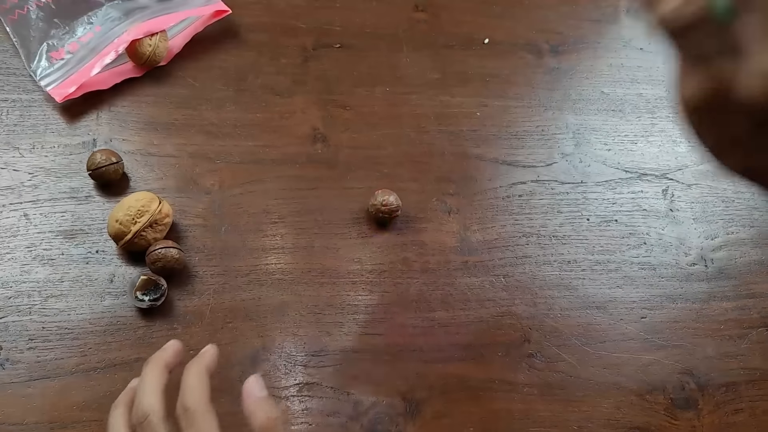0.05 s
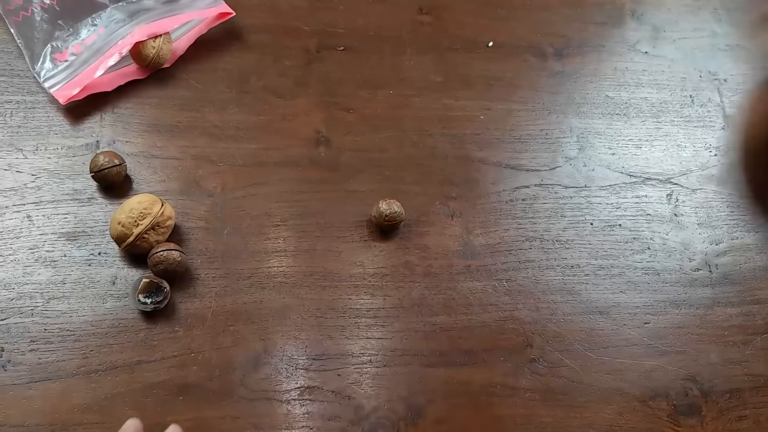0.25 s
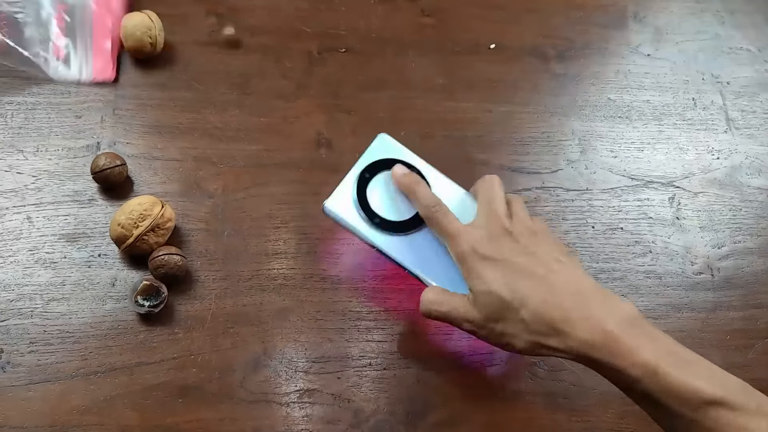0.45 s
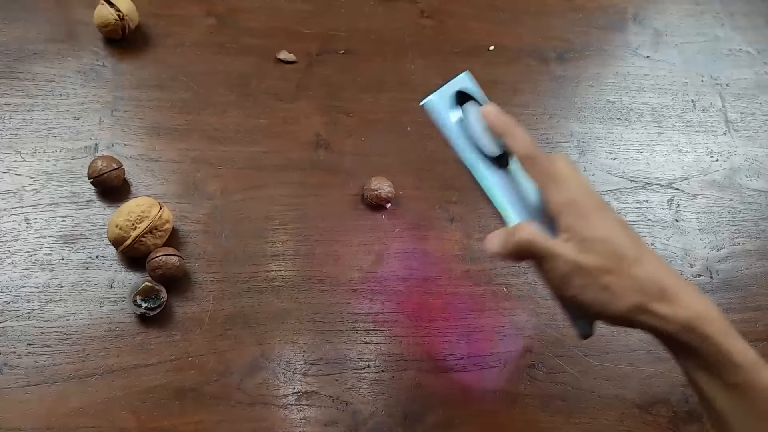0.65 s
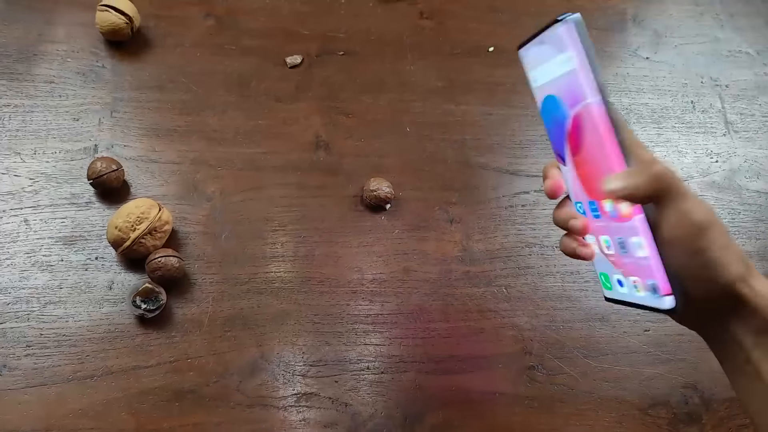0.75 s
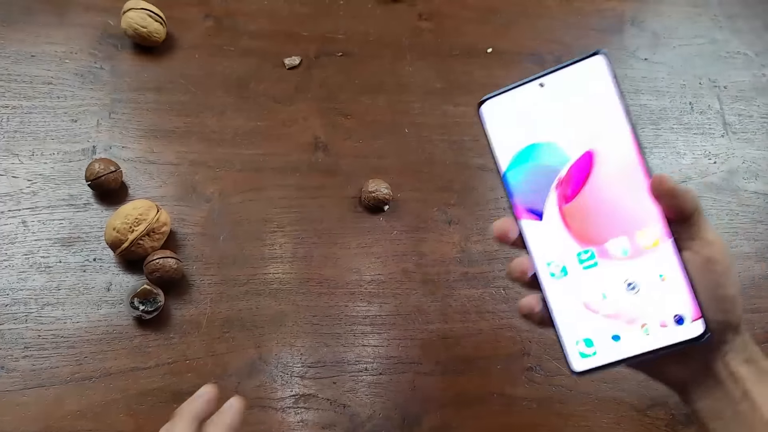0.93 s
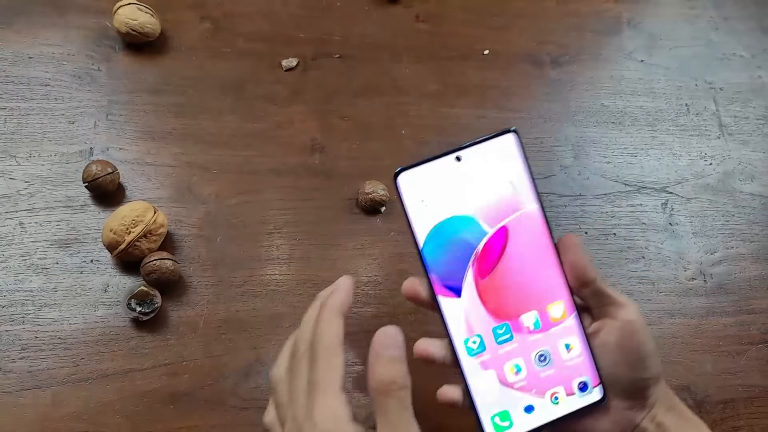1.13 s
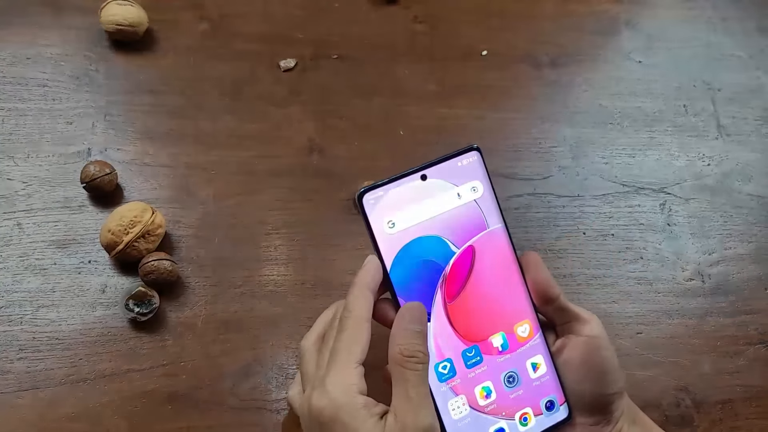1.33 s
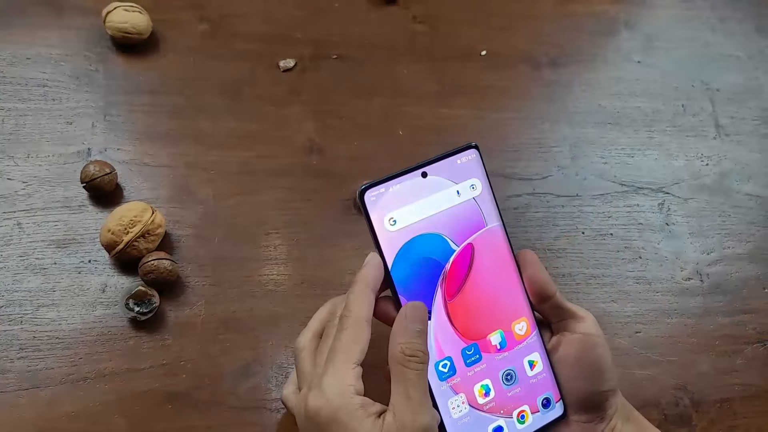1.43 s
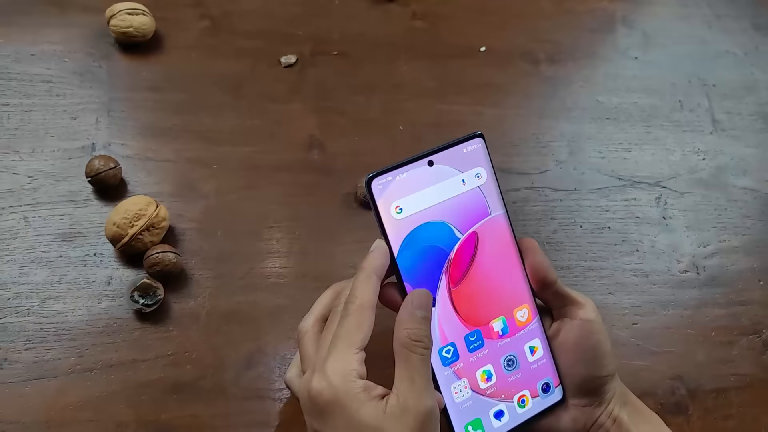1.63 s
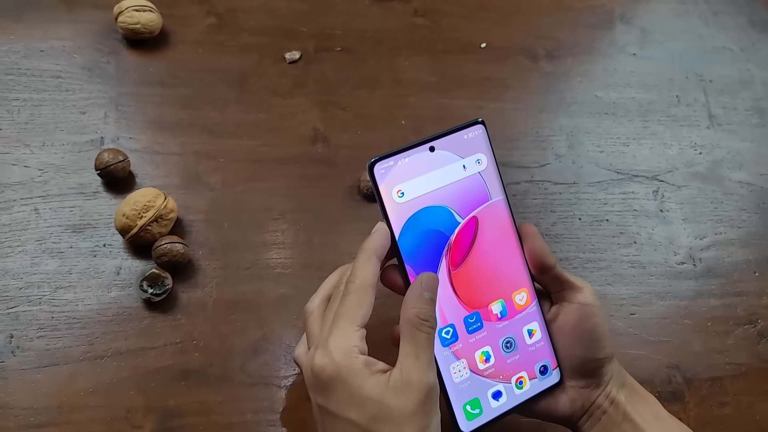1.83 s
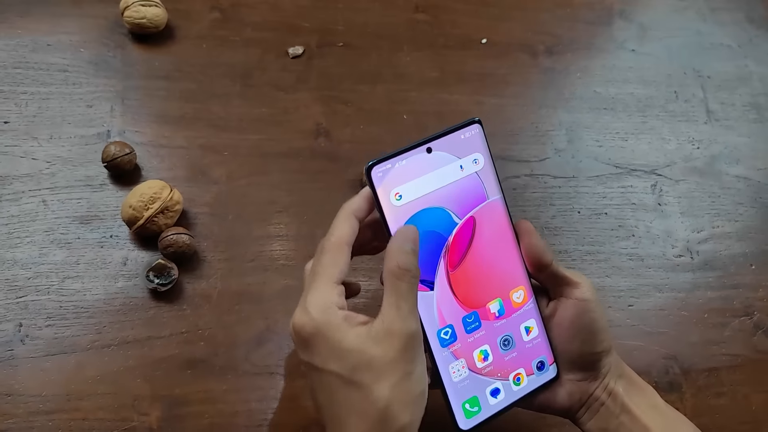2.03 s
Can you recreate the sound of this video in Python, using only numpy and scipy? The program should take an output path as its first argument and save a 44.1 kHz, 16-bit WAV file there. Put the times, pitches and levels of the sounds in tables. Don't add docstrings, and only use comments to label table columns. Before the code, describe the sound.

After a couple of faint taps, one violent wooden bang with a shell crunch overloads the close microphone; the echo is held up, then tiny chips tick down and thin metal pings softly across the small room.

```python
import sys
import numpy as np
from scipy import signal
from scipy.fft import rfft, irfft
from scipy.io import wavfile
from scipy.ndimage import uniform_filter1d

SR = 44100
rng = np.random.default_rng(int(sys.argv[2]) if len(sys.argv) > 2 else 0)


def linear_from_db(decibels):
    return 10 ** (np.asarray(decibels, float) / 20)


def store_wav(level_fs):
    pcm = np.round(np.clip(np.atleast_2d(level_fs), -1, 1) * 32767)
    wavfile.write(sys.argv[1], SR, pcm.T.astype(np.int16))


N = 91639
LEAD = SR // 2
SECOND = np.arange(SR) / SR
SLAM_S = .4606


def silence():
    return np.zeros(N + LEAD)


def evened(x):
    return x / np.sqrt(np.mean(x ** 2) + 1e-20)


def read(points, hz):
    f, value = np.transpose(points)
    return np.interp(np.log(hz + 1), np.log(f + 1), value)


def add(mix, s, sound):
    part = mix[LEAD + round(s * SR):][:len(sound)]
    part += sound[:len(part)]


def colour(x, points):
    return irfft(rfft(x) * linear_from_db(read(points, np.fft.rfftfreq(len(x), 1 / SR))), len(x))


def bump(hz, octaves):
    f = np.geomspace(20, 22000, num=120)
    level_db = -6 * (np.log2(f / hz) / octaves) ** 2
    return np.transpose([f, np.maximum(level_db, -80)])


def fade(db, t60):
    return linear_from_db(db - 60 * SECOND / t60)


def rise(s):
    return np.minimum(SECOND / s, 1)


# f/Hz, t60/s
ROOM_DECAY = [(100, 0.41), (500, 0.34), (2000, 0.33), (5000, 0.37), (10000, 0.29), (16000, 0.17)]


def echo(points, build_s):
    noise = evened(colour(rng.standard_normal(SR), points))
    hz, t, z = signal.stft(noise, SR, nperseg=512, noverlap=384)
    z = z * linear_from_db(-60 * t / read(ROOM_DECAY, hz)[:, None])
    tail = signal.istft(z, SR, nperseg=512, noverlap=384)[1][:SR]
    return tail * (1 - np.exp(-SECOND / build_s))


def ring(modes, spread=0, count=1):
    out = np.zeros(SR)
    for hz, db, t60 in modes:
        for off, turn in zip(rng.standard_normal(count), rng.random(count)):
            tone_hz = hz + spread * (hz + 1000) * off
            out += fade(db, t60) * np.sin(2 * np.pi * (tone_hz * SECOND + turn))
    return out


def push(mix):
    peak_s, base_hz, extra_hz, sweep_s = .4582, 180, 120, .0018
    grow_s, swell_s = .0012, .019
    u = np.arange(-.02, .0023, 1 / SR)
    turns = np.cumsum(base_hz + extra_hz * np.exp(u / sweep_s)) / SR
    wave = np.cos(2 * np.pi * (turns - np.interp(0, u, turns)))
    peak = linear_from_db(-2.5) * 2 / (np.exp(u / grow_s) + np.exp(-u / grow_s))
    swell = linear_from_db(-26) * np.clip(2 * (1 + u / swell_s), 0, 1)
    end = np.minimum((u[-1] - u) / .0008, 1)
    add(mix, peak_s + u[0], (peak + swell) * wave * end)


# f/Hz, level/dB
CRACK_COLOUR = [(60, -4.5), (500, 1), (2100, -15), (2840, -8.5), (4420, -7.5), (5600, -26.5), (11800, -31),
                (16000, -55)]


def crack():
    splinters_per_s = 2000
    bits = rng.standard_normal(SR) * (0.21 + (rng.random(SR) < splinters_per_s / SR))
    return evened(colour(bits, CRACK_COLOUR)) * fade(24.5, 0.066) * rise(0.0012)


# f/Hz, level/dB, own t60/s (not used)
TABLE_TONES = [(112.3, 0.5, 0.17), (228.2, -1, 0.56), (334.1, -4, 1.7), (424.7, -7.5, 0.86), (598, -8, 2.7),
               (827, -5, 0.61), (892, -6, 5.0), (934, -7.5, 0.45), (1023, -14, 0.35), (1160, -20, 5.0),
               (1270, -4.5, 0.36), (1475, -13, 5.0)]
# f/Hz, level/dB, t60/s
THUMP_TONES = [(174.6, 23.5, 0.055), (420, 18, .1)]


def table_top():
    tones = [(hz, db, 0.31) for hz, db, _ in TABLE_TONES]
    return (linear_from_db(2) * ring(tones, 0.00985, count=2) + ring(THUMP_TONES)) * rise(0.006)


def rattle():
    taps_per_s = 400
    taps = (rng.random(SR) < taps_per_s / SR) * rng.standard_normal(SR)
    return evened(colour(taps, bump(1400, 0.33))) * fade(2, .35) * rise(.004)


# f/Hz, level/dB, t60/s
BOOM_TONES = [(61.3, -10.5, 0.74), (67.5, -11, 0.72)]


def boom():
    line_up_s = .164
    out = np.zeros(SR)
    for hz, db, t60 in BOOM_TONES:
        out += fade(db, t60) * np.cos(2 * np.pi * hz * (SECOND - line_up_s))
    return out * rise(0.049)


# f/Hz, level/dB
SLAM_ECHO = [(60, -15), (118, -9), (900, -9.5), (4400, -21.5), (5900, -38), (7800, -33), (13000, -43.5),
             (16000, -93.5)]


def slam():
    out = silence()
    push(out)
    room = linear_from_db(9.5) * echo(SLAM_ECHO, 0.0033)
    add(out, SLAM_S, crack() + table_top() + rattle() + boom() + room)
    return out


# f/Hz, level/dB
NO_COLOUR = [(20, 0), (20000, 0)]


def clicks(rows, octaves, t60, body):
    out, t = silence(), np.arange(1024) / SR
    lag_s = 200 / SR
    for s, db, hz, echo_db in rows:
        life = t60 * np.sqrt(3000 / hz)
        shape = bump(hz, octaves)
        shape[:, 1] += read(body, shape[:, 0])
        spike = rng.standard_normal(1024) * .04 * (t > lag_s) + (t == lag_s)
        snap = colour(spike, shape) * linear_from_db(-60 * abs(t - lag_s) / life)
        add(out, s - lag_s, linear_from_db(db) * snap / abs(snap).max())
        add(out, s, linear_from_db(db + echo_db) * echo(shape, 0.001))
    return out


# t/s, level/dB,
# f/Hz, echo level/dB
CHIP_LANDINGS = [(.4285, -39.5, 6940, -41), (.4465, -33, 4630, -16), (.4515, -51, 8000, -32),
                 (.702, -31, 4000, -26.5), (.783, -52, 8000, -8), (.824, -43, 8050, -7.5),
                 (.9455, -36, 7700, -4), (.9558, -27.5, 9000, -18.5), (.9598, -21, 9100, -24),
                 (1.131, -40, 8000, -33.5), (.9035, -36, 8894, -22.5), (1.1938, -21.5, 11040, -11.5),
                 (1.1966, -17, 9000, -17), (1.2066, -21, 8000, -22), (1.410, -43, 7900, -8),
                 (1.4215, -33.5, 4940, -21), (1.678, -37, 10000, -5.5), (1.071, -50, 9600, -5.5)]
# f/Hz, level/dB
CHIP_COLOUR = [(880, -44), (1500, -4.5), (3520, -3.5), (6890, -6.5), (7930, 2), (12400, -13), (14000, -21),
               (14800, -10), (16500, -74.5)]


def shell_chips():
    return clicks(CHIP_LANDINGS, 1.71, 0.0068, CHIP_COLOUR)


# t/s, level/dB, f/Hz, echo level/dB
PIECE_DROPS = [
    (1.1292, -22, 4530, -12.5),
    (1.140, -30, 4960, -17),
]
# f/Hz, level/dB
PIECE_COLOUR = [(290, -39), (500, -1.5), (2320, -10.5), (3620, -2.5), (6060, -5.5), (9880, -16.5),
                (14000, -67)]


def larger_piece():
    return clicks(PIECE_DROPS, 2.7, 0.0048, PIECE_COLOUR)


# t/s, level/dB, f/Hz, echo level/dB
SPLINTER_LANDING = [
    (1.1952, -30, 14300, -12),
]


def thin_splinter():
    return clicks(SPLINTER_LANDING, .12, 0.0068, NO_COLOUR)


# t/s, level/dB, f/Hz, echo level/dB
TICK_TIMES = [
    (.208, -37, 610, -22),
    (.246, -35, 580, -16),
    (.3658, -33, 2400, -24),
    (.9036, -30, 1700, -20),
    (1.131, -44.5, 970, -5),
    (1.281, -37, 3000, -15.5),
    (1.3469, -36.5, 2930, -13),
    (2.045, -42, 500, -9.5),
]


def ticks():
    return clicks(TICK_TIMES, 0.53, 0.021, NO_COLOUR)


def struck_metal(hits, modes, clang):
    out = silence()
    for s, ring_db, clang_db in hits:
        bell = ring(modes, .012, count=8) * (1 - np.exp(-SECOND / 0.0077))
        add(out, s, linear_from_db(ring_db) * bell + linear_from_db(clang_db) * echo(clang, 0.0013))
    return out


# t/s, ring level/dB, clang level/dB
SIDE_HITS = [
    (1.5076, -39.5, -25.5),
    (1.515, -36.5, -29),
]
# t/s, ring level/dB, clang level/dB
EDGE_HITS = [
    (1.7155, -43.5, -38),
]
# t/s, ring level/dB, clang level/dB
PAST_HITS = [
    (-0.34, -54, -40),
]
# f/Hz, level/dB, t60/s
SIDE_TONES = [(700.5, -10, 0.82), (763, -13.5, 0.55), (1157, -22, 1), (1488, -4.5, 0.44), (1734, -9, 0.65),
              (1913, -9, .5), (2518, -0.5, 0.85), (7620, -13, 0.22), (3241, -7, 0.58), (3577, -2.5, 0.39),
              (3945, -4, 0.53), (4312, -0.5, 0.34), (6420, 1, 0.37), (11900, -20, .3), ]
EDGE_TONES = [(1427, -7.5, 0.58), (1567, -7, 0.4), (1840, -9, 0.55), (2502, -4, 1.19), (2730, 1, 0.43),
              (3305, -7, 0.45), (4016, -4.5, 0.35), (4160, -5, 0.36), (6380, -3, 0.35), (7500, -4.5, 0.27)]
# f/Hz, level/dB
SIDE_CLANG = [(400, -28), (700, -19.5), (2200, -16.5), (2900, -7.5), (4600, -8), (5500, -14), (7500, -4),
              (16000, -37.5)]
EDGE_CLANG = [(240, -44), (400, -15), (1460, -30), (2050, -8), (2710, -10.5), (6340, -14.5), (10900, -22.5),
              (16000, -77)]


def tin():
    side = struck_metal(SIDE_HITS, SIDE_TONES, SIDE_CLANG)
    rim = struck_metal(EDGE_HITS, EDGE_TONES, EDGE_CLANG)
    return side + rim + struck_metal(PAST_HITS, SIDE_TONES, SIDE_CLANG)


# f/Hz, level/dB
HUM_COLOUR = [(15, -45.5), (25, 1.5), (584, -4.5), (1770, -15.5), (2360, -26), (2970, -22.5), (4730, -30),
              (8360, -50.5), (12000, -45), (15600, -81), (22000, -120)]
# f/Hz, width/Hz, level/dB
HUM_HOLLOWS = [(246.2, 27, -59.5), (571.5, 27, -60.5)]


def hum():
    n = N + LEAD
    noise = colour(rng.standard_normal(n), HUM_COLOUR)
    hz, t, z = signal.stft(noise, SR, nperseg=1024, noverlap=768)
    patches = uniform_filter1d(rng.standard_normal(z.shape), 8, 0)
    patches = evened(uniform_filter1d(patches, 10, 1))
    drifting = signal.istft(z * linear_from_db(2.0 * patches), SR, nperseg=1024, noverlap=768)[1][:n]
    out = linear_from_db(-52.5) * evened(drifting)
    for f, width, db in HUM_HOLLOWS:
        b, a = signal.iirpeak(f, f / width, SR)
        out = out + linear_from_db(db) * evened(signal.lfilter(b, a, rng.standard_normal(n)))
    s = (np.arange(n) - LEAD) / SR
    return out * (1 + linear_from_db(4.5 - 60 * np.maximum(s, 0) / 0.12))


def scene():
    mix = slam() + shell_chips() + larger_piece() + thin_splinter() + ticks() + tin() + hum()
    return mix[None, LEAD:]


def low_pass(x):
    return signal.sosfilt(signal.butter(12, 16630, fs=SR, output="sos"), x)


def record(dry):
    duck_db, hold_s, recover_db_per_s = 24, 0.009, 157
    since = np.arange(N) / SR - SLAM_S
    down_db = duck_db - recover_db_per_s * np.maximum(since - hold_s, 0)
    down_db = (since >= 0) * np.maximum(down_db, 0)
    low_cut = signal.butter(2, 64, "high", fs=SR, output="sos")
    cut = signal.sosfilt(low_cut, dry / linear_from_db(down_db))
    limited = np.tanh(cut * 0.96) * 0.91
    edge = signal.firwin(255, 16500, window=("kaiser", 9), fs=SR)
    return low_pass(signal.oaconvolve(limited, edge[None], "same"))


dry = scene()
out = record(dry)
store_wav(out)
```